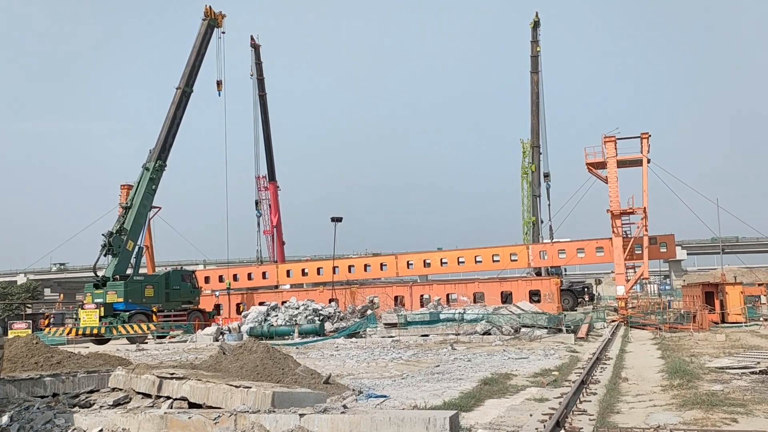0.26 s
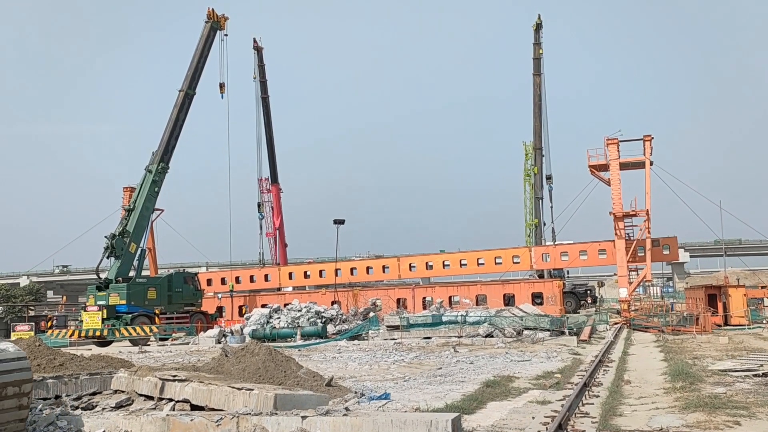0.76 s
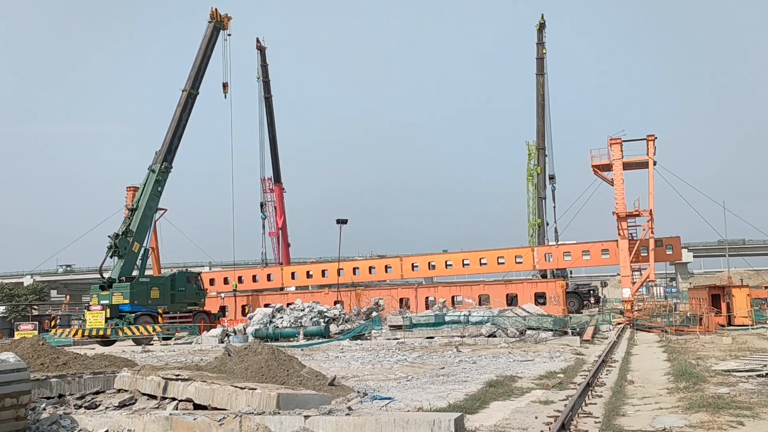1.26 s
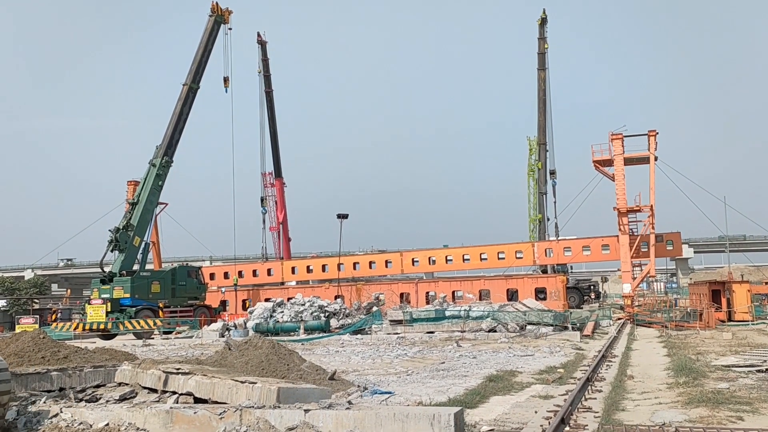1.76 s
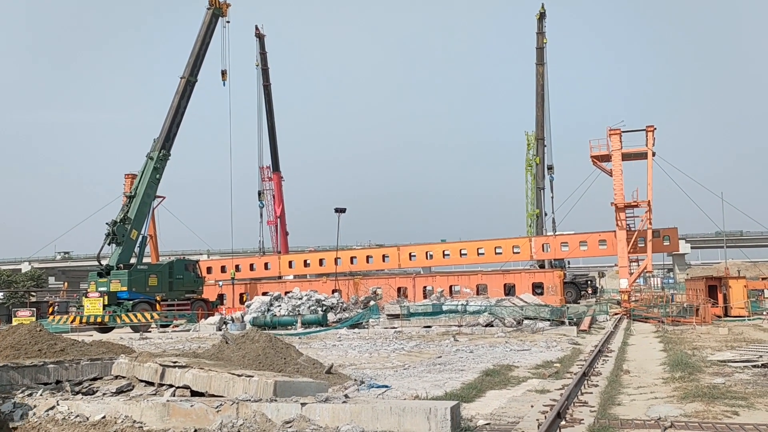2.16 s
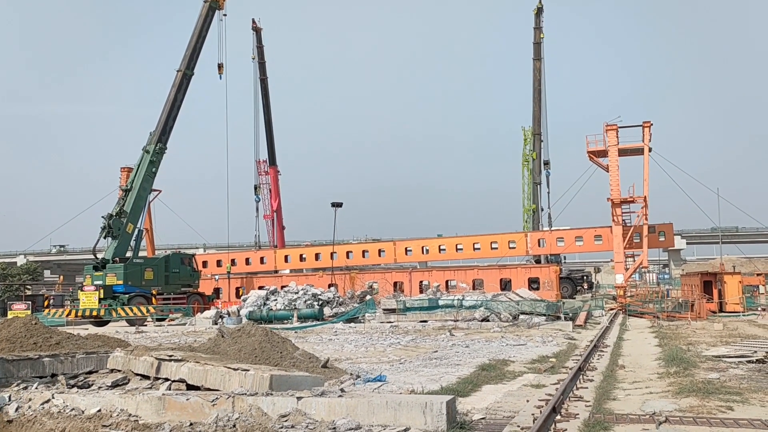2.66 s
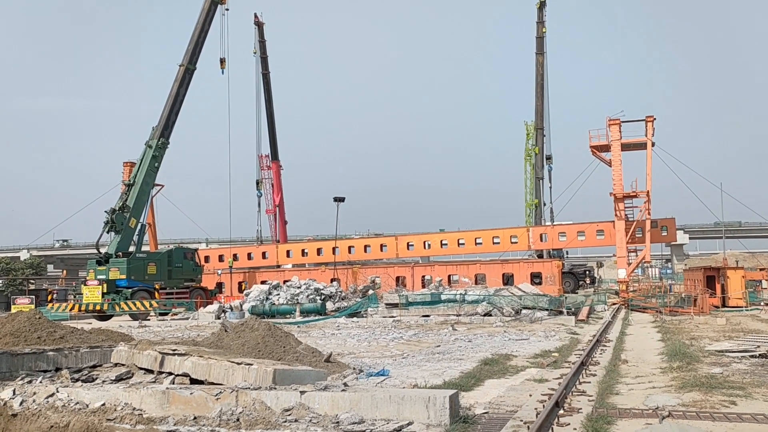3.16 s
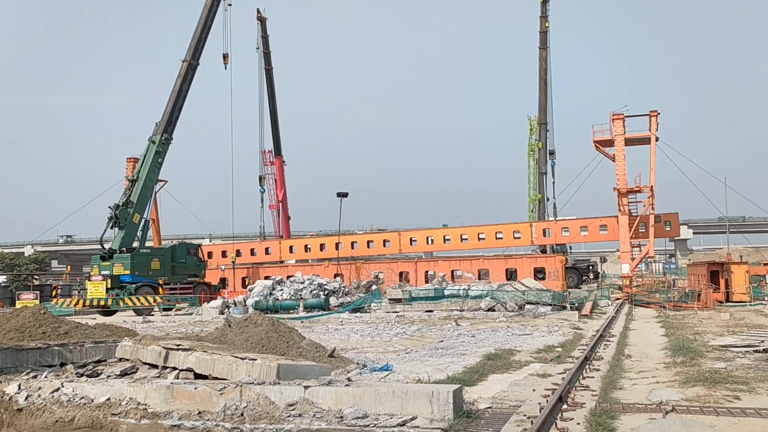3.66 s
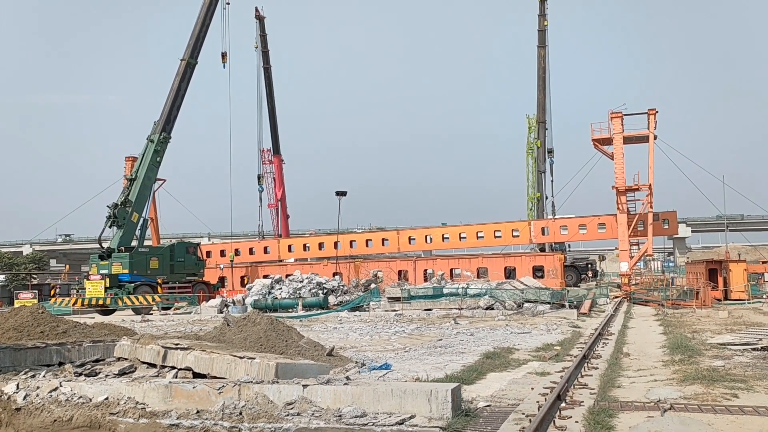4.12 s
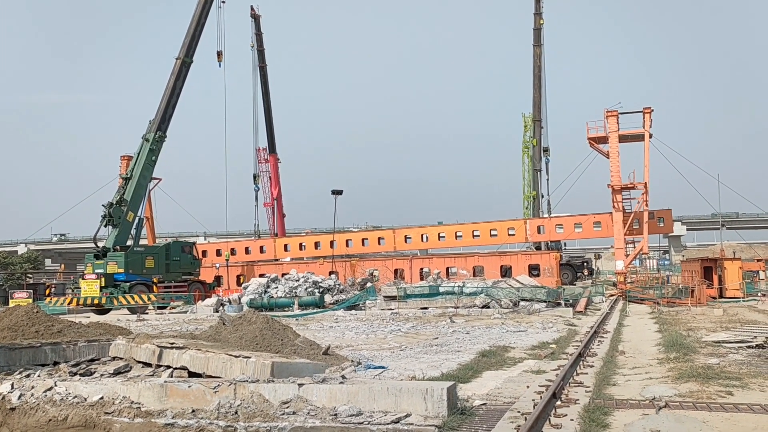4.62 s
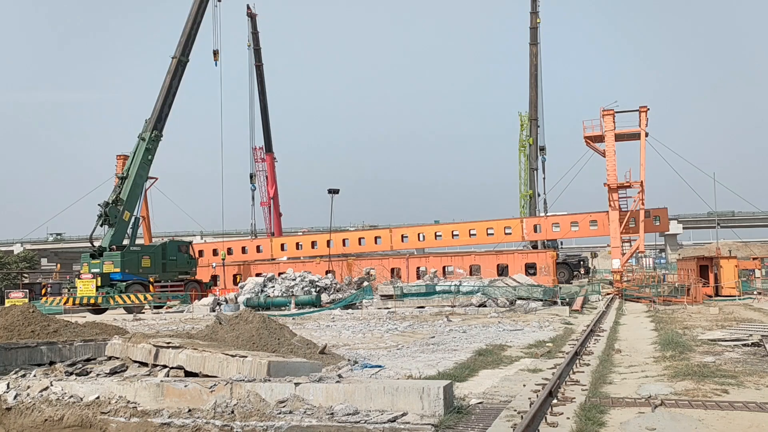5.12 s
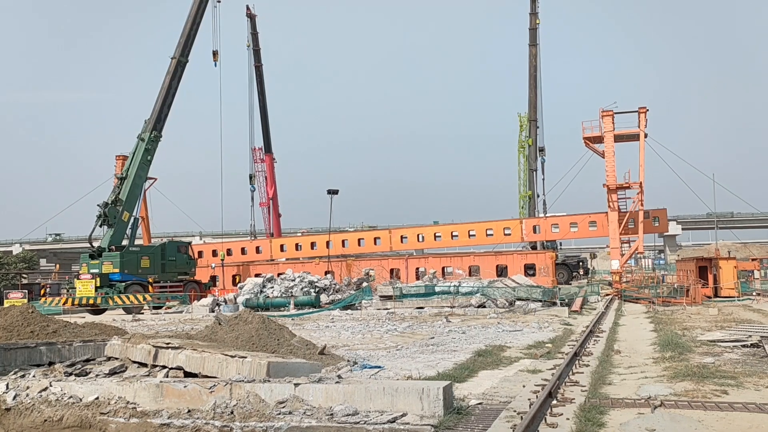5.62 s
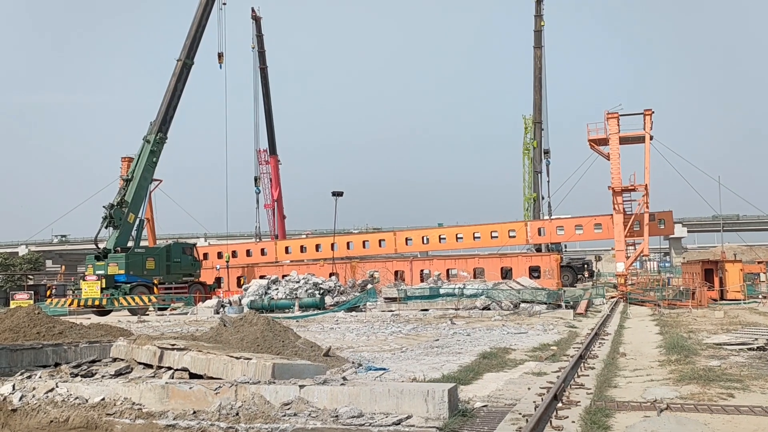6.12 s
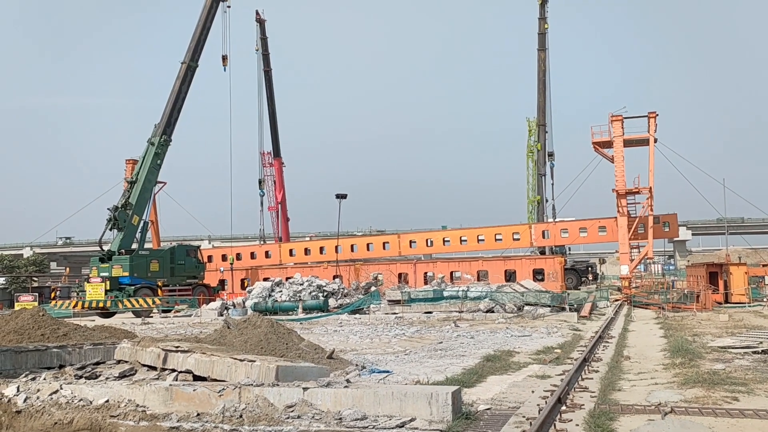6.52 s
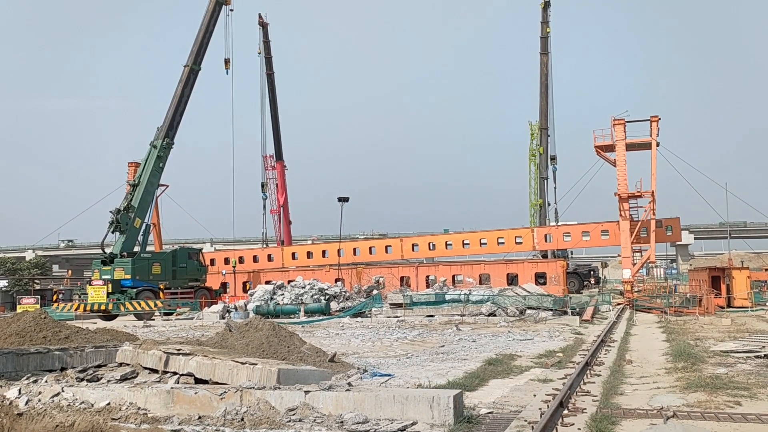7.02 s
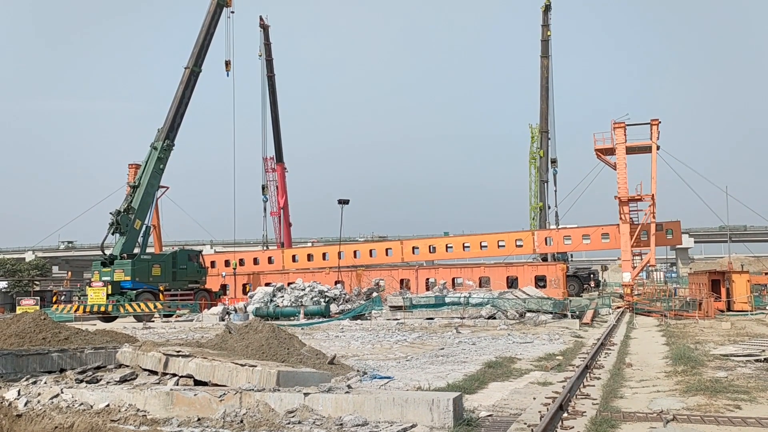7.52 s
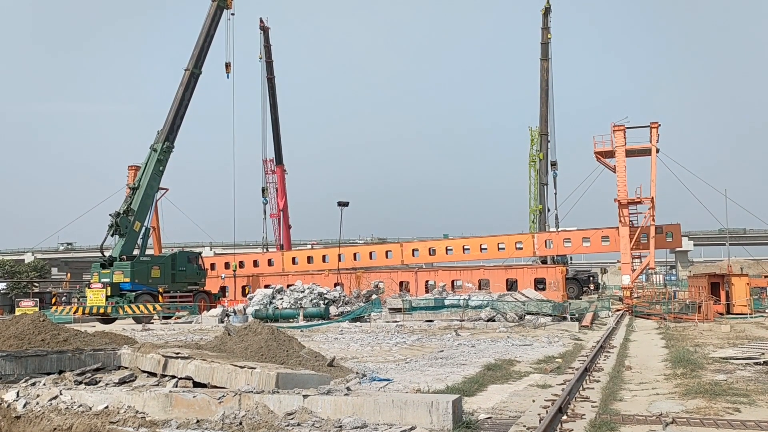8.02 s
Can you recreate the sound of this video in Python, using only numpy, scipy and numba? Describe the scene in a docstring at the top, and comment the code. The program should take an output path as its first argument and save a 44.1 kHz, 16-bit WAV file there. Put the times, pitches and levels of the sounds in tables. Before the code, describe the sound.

On an open building site, a crane's diesel engine runs steadily a little to the left, with a wavering hydraulic whine over a broad machinery roar. In the first two seconds, steel girders bang and ring in several quick clusters. The engine then labours on with faint chain clinks while wind gusts thump the microphone. Near the end it speeds up slightly and loose steel rattles lightly.

```python
"""An open building site: a crane's six-cylinder diesel works to the left of a phone with two ports.
One shaft drives exhaust, fan and nine-piston pump, so their pitches move together over the plant's roar.
Struck girders ring in their modes, chains clink, something squeals, and loose steel rattles as the load
is let go. Gusts buffet each port on its own, and the phone's gain control dips under the loudest sounds."""
import sys
import numpy as np
from scipy import signal
from scipy.fft import rfft, irfft
from scipy.io import wavfile
from scipy.ndimage import uniform_filter1d
from numba import njit

SR = 44100
rng = np.random.default_rng(int(sys.argv[2]) if len(sys.argv) > 2 else 0)


def to_wav(sig):
    """Store sig (one row per channel, or 1-D mono) as 16-bit WAV at the path in sys.argv[1].

    Samples outside -1..1 are clipped; the rate is SR.
    """
    pcm = np.clip(np.atleast_2d(sig), -1, 1) * 32767
    pcm = np.round(pcm).astype(np.int16)
    wavfile.write(sys.argv[1], SR, pcm.T)  # frames by channels


N = 365148
T = np.arange(N) / SR
TREBLE_LAG, STEEL_LAG, HUM_LAG = 19, 13, 31  # samples by which the right port hears later

# The shaft sags under load and speeds up on release: (time [s], piston rate [Hz])
PISTON_RATE = [(0, 257), (1.1, 260.8), (1.5, 260), (1.75, 257.5), (2.4, 253.7), (2.7, 252.3), (3.16, 252.8),
               (3.4, 250), (4.08, 252.8), (4.5, 252.3), (4.8, 250.7), (5.6, 250.3), (6.4, 251), (6.65, 256),
               (6.85, 262.6), (8.28, 255.2)]
# Strength of two machine tones: (time [s], pump whine [dB], fan tone [dB])
TONE_LEVELS = [(0, -26, -28.5), (.25, -38.5, -29.5), (.35, -28, -34), (.55, -22.5, -28), (.7, -20, -30),
               (.85, -32, -31), (1.25, -34.5, -29), (1.55, -31, -29), (1.62, -23.5, -40),
               (1.75, -35.5, -30.5), (2.1, -36, -30.5), (2.35, -31, -32), (2.7, -29, -28.5),
               (3.1, -24, -26), (3.4, -30, -30.5), (3.8, -28, -26.5), (4.2, -27, -28), (4.6, -26, -28),
               (4.9, -28, -25.5), (5.2, -25, -25), (5.6, -22.5, -27), (5.8, -22.5, -22), (5.93, -26, -27.5),
               (6.05, -25, -26.5), (6.3, -25.5, -28), (6.5, -24, -35), (6.66, -31.5, -33), (6.72, -40, -27),
               (6.78, -31, -31), (6.93, -33, -35), (7.0, -34, -30), (7.1, -37, -29.5), (7.17, -44, -31),
               (7.22, -30.5, -26), (7.3, -29.5, -31.5), (7.6, -27.5, -26), (7.9, -28, -27.5),
               (8.28, -24.5, -32)]
# Pump harmonics, plus an engine tone near 2340 Hz at 9.33: (multiple of piston rate [ratio], level [dB])
MACHINE_TONES = [(1, -39), (3, -56), (4, -58), (5, -61), (6, -60), (7, -60), (8, -58), (9, -59),
                 (9.33, -64), (10, -57), (11, -61)]
# Passing swells of those tones: (centre time [s], length [s], multiple [ratio], rise [dB])
TONE_SWELLS = [(2.75, 1.4, 3, 12), (4.5, 2.4, 3, 7), (6.1, 1., 3, 9), (6.95, .5, 3, 8), (8.1, .4, 3, 9),
               (6.95, .3, 4, 8), (7.5, .9, 4, 11), (6.35, .35, 5, 12), (6.8, .4, 5, 11), (7.35, .7, 5, 10),
               (5.4, 1.2, 4, 5), (5.9, .7, 7, 7), (6.85, .3, 7, 10), (3.45, .4, 8, 7), (5.2, 1., 8, 9),
               (6.95, .35, 8, 10), (5.4, .6, 9, 6), (6.2, .7, 9, 10), (6.9, .2, 9, 8), (4.85, .6, 9.33, 13),
               (4.85, .6, 10, 6), (5.95, 1.2, 10, 9), (6.5, .25, 11, 10)]
# Upper layers of the roar: (time [s], top [dB], treble [dB], middle [dB])
ROAR_LEVELS = [(0, -40, -36.5, -36), (.3, -39.5, -40, -39), (.6, -35, -37.5, -33), (1.18, -37.5, -37, -36),
               (1.88, -37.5, -38.5, -36.5), (2.15, -35, -38.5, -36.5), (2.7, -36, -36.5, -36),
               (3.0, -35, -37.5, -37), (3.16, -36, -35.5, -34), (3.39, -37, -38.5, -38),
               (4.0, -37, -38, -37), (4.2, -35.5, -36.5, -35.5), (4.82, -37, -36.5, -34.5),
               (5.55, -35, -36, -36.5), (6.1, -39.5, -39.5, -37.5), (6.6, -37.5, -38.5, -38),
               (6.8, -34.5, -37.5, -37.5), (7.22, -37.5, -38, -36.5), (7.5, -34, -35.5, -35),
               (7.79, -37.5, -35.5, -33.5), (7.95, -34, -34.5, -34), (8.28, -35.5, -35, -34)]
# Roar spectrum before each layer is set to its level: (frequency [Hz], relative density [dB])
ROAR_SPECTRUM = [(30, -6), (90, -13.5), (170, -6), (260, -16), (420, -17.5), (650, -28), (1050, -28),
                 (1550, -27.5), (2350, -27.5), (2900, -27.5), (3450, -29), (3850, -26), (5000, -30),
                 (6000, -33.5), (7300, -56)]
# Roar arriving straight from the machine: (frequency [Hz], share of power [0-1])
DIRECT_SHARE = [(60, .92), (170, .9), (330, .82), (520, .3), (700, .15), (900, .22), (1150, .68),
                (1600, .6), (2000, .22), (2600, .35), (3300, .38), (6000, .36)]
# Lead of the left port for that direct sound: (frequency [Hz], phase [rad])
LEFT_LEAD = [(0, 0), (170, .7), (260, .2), (350, 0), (780, 1.3), (1210, 2.9), (1640, 3.2), (1890, 3.5),
             (2580, 6.8), (2840, 8.9), (3100, 9.8), (3530, 9.2), (3880, 11.3), (4480, 12.3), (6030, 15.6),
             (6630, 18.9)]
# Blows on steel: (time [s], level [dB], rise [ms], decay [s], low-pass corner [Hz], boom [dB], clang [dB])
BLOWS = [(.0, -25.5, 2, 0.086, 1490, -18, 1.5), (0.065, -26.5, 2.5, 0.064, 1500, 7, 5),
         (0.415, -37.5, 15, 0.17, 4020, -9, 2), (0.462, -24, 6, 0.039, 6100, -10, -2.5),
         (0.505, -26, 5, 0.056, 7000, -4.5, 5), (0.676, -19, 9.1, 0.048, 5400, -3, 10),
         (0.706, -19, 6, 0.045, 7500, -7, 0), (0.737, -26, 3.9, 0.025, 4970, 11, 4),
         (0.775, -29.5, 5, 0.035, 1500, 6.5, 3.5), (1.223, -21, 2.2, 0.051, 3220, -6, 0),
         (1.255, -28.5, 5.3, 0.088, 3000, 0, 7), (1.312, -17.5, 12, 0.038, 3430, 3, 0),
         (1.343, -23, 6, 0.068, 2600, -0.5, 1.5), (1.422, -24.5, 8.7, 0.056, 2200, -1, 4.5),
         (1.526, -28.5, 3.7, 0.016, 3030, -2, -3), (1.58, -29, 8, 0.026, 1490, -5, -3),
         (1.608, -33.5, 5, 0.045, 786, -7, 1)]
# Girder resonances: (frequency [Hz], bandwidth [Hz], relative level [dB])
GIRDER_MODES = [(192, 28, 0.5), (309, 60, -3.5), (412, 34, -7), (584, 46, -13.5), (622, 28, -25),
                (748, 26, -19), (786, 19, -15.5), (898, 126, -8.5), (1057, 67, -12), (1300, 170, -13),
                (1705, 140, -16), (2300, 94, -14.5)]
# Broadband part of a blow: (frequency [Hz], relative density [dB])
CRASH_SPECTRUM = [(71, -35.5), (120, -21.5), (200, 1), (262, -7.5), (726, -11), (905, -13.5), (1580, -16.5),
                  (4780, -19.5), (6940, -25), (9020, -97), (15300, -120)]
# Wind strength: (time [s], rumble level [dB], left minus right [dB])
GUSTS = [(0, -41, -4.5), (.35, -33, -12), (.97, -24, 14), (1.2, -42, 5), (1.45, -30, -7), (1.71, -26, 0.5),
         (1.96, -36, -15.5), (2.15, -28.5, 0), (2.67, -39, -7), (2.8, -33, -11), (2.93, -28, -10),
         (3.25, -31, -4.5), (3.39, -40.5, -6), (3.76, -25, 3), (3.89, -40, -12), (4.4, -37, -2),
         (5.3, -48, 1.5), (5.47, -25, 13.5), (5.6, -33, 3.5), (5.7, -23, 24), (5.83, -33, 7),
         (5.93, -22, 22), (6.08, -30, 12.5), (6.48, -26, -2), (6.57, -35.5, 12.5), (7.12, -44, 7),
         (7.7, -40.5, -6.5), (8.0, -31, 16), (8.08, -38, 10), (8.28, -30, 20)]
# Strong eddies: (time [s], port [0 left, 1 right], level [dB], pitch [Hz], width [ms], relative slap [dB])
EDDIES = [(.248, 1, -11, 92, 5, -10), (0.521, 1, -22, 260, 6.3, -12), (0.59, 1, -11, 168, 9.1, -8),
          (.782, 0, 0.5, 167, 5, -16), (0.819, 0, -16, 130, 7.7, -22), (.994, 0, -0.5, 91, 6.3, -11),
          (1.059, 0, -10.5, 127, 6.2, -2), (1.682, 0, -12, 200, 10.5, -3.5), (1.997, 1, -19, 92, 10, -11),
          (2.612, 0, -7, 171, 3.3, -10), (2.884, 0, -19, 202, 4.1, -9), (2.945, 0, -11, 170, 8, -10),
          (2.945, 1, -17, 141, 8.5, -2), (3.009, 1, -12, 201, 6.5, -21), (3.106, 1, -8.5, 153, 4, -17),
          (3.127, 0, -7, 170, 4, -11), (3.161, 1, -3, 87, 4.6, -7), (3.173, 0, -9.5, 190, 8.7, 9.5),
          (3.184, 0, -4, 54.7, 13, -28), (3.22, 0, -1.5, 140, 2.9, -13), (3.27, 0, -4, 94, 11.7, -12.5),
          (3.315, 1, -13, 60, 8, -20), (3.332, 0, -21, 298, 4.4, -7), (3.342, 1, -10, 200, 6.8, -11),
          (3.584, 0, -13.5, 161, 12, -18), (3.607, 0, -16.5, 60, 10, -25), (3.696, 1, -8.5, 151, 7.9, -5),
          (3.74, 1, -3, 112, 4.9, -5), (3.809, 1, -14, 109, 9, -6), (4.776, 1, -7, 150, 3.7, -24),
          (5.474, 0, -6.5, 143, 7.3, -4.5), (5.49, 0, -12.5, 39.8, 16, -30), (5.506, 0, -11, 96, 7.6, -21),
          (5.615, 1, -11, 129, 5.3, -27), (5.676, 0, -9, 91, 9.4, -6), (5.689, 0, -10, 38, 15, -32),
          (5.715, 0, -1.5, 140, 4.7, -11), (5.734, 0, -13, 40, 15, -26), (5.767, 0, -13, 220, 5, 2.5),
          (5.807, 1, -12, 202, 8, -18), (5.834, 0, -1, 200, 5.5, -29), (5.879, 0, -2, 117, 4.3, -8),
          (5.923, 0, -4.5, 248, 7, -3), (5.941, 0, -8, 60, 12, -30), (5.97, 1, -14, 100, 6, 0),
          (5.983, 0, -4.5, 90, 4.3, -14), (6.007, 0, 2, 107, 11.5, -33), (6.059, 0, -7, 93, 6, -5.5),
          (6.156, 0, -13, 179, 13, -2), (6.1, 0, -12, 171, 9.3, -19), (6.197, 0, -11.5, 211, 8.6, -2),
          (6.25, 0, -9, 131, 11.4, -9), (6.288, 1, -2.5, 65, 11, -7), (6.294, 0, 3.5, 77, 10.3, -10),
          (6.345, 0, -8, 140, 7.3, -17), (6.347, 1, -21, 603, 5.4, -2), (6.386, 0, -8.5, 150, 6.8, -15),
          (6.404, 1, -4, 170, 2.8, -8.5), (6.451, 0, -13, 130, 11, -24), (6.482, 0, -12.5, 134, 16, -3),
          (6.52, 1, -14, 220, 7.2, -14), (6.538, 0, -7, 190, 4.4, -12), (7.013, 0, -15.5, 194, 7, -15),
          (7.978, 0, -2, 166, 4.9, -14), (8.233, 0, -6, 50, 20, -13)]
# Chain links and plates: (centre time [s], level [dB], frequency [Hz], half-width [s])
CHAIN_CLINKS = [(0.51, -25.5, 4040, 0.0094), (1.627, -34.5, 632, 0.058), (2.149, -40, 3700, 0.092),
                (2.439, -33, 2200, 0.024), (2.433, -39, 3220, 0.016), (4.16, -37, 1960, 0.041),
                (7.187, -39, 2050, 0.068), (7.35, -38.5, 807, 0.06), (7.36, -42, 2400, 0.062),
                (7.548, -34.5, 2770, 0.032), (7.512, -36, 1930, 0.077), (7.622, -42, 790, .04),
                (7.94, -37, 964, 0.044), (7.847, -38, 1940, 0.11), (7.928, -38, 2440, 0.085),
                (8.158, -38, 2740, 0.04)]
# Chatter of loose steel: (time [s], level [dB])
RATTLE_LEVELS = [(6.6, -69.5), (6.85, -43), (7.2, -42), (7.35, -42), (7.55, -40), (7.7, -42), (7.9, -36),
                 (8.05, -43), (8.17, -40), (8.28, -43)]
# Faint high hiss: (time [s], level [dB])
HISS_LEVELS = [(0, -66), (.3, -69), (.62, -61), (1.3, -72), (2.16, -67), (3.1, -65), (3.3, -69),
               (5.45, -65), (6.34, -73), (6.63, -70), (6.78, -57), (7.02, -64), (8.28, -64)]
# Bands of that hiss: (centre frequency [Hz], relative level [dB])
HISS_SPECTRUM = [(10600, 0), (13600, -4)]


def undb(db):
    """Amplitude grows tenfold for every 20 dB."""
    return 10 ** (np.asarray(db) / 20)


def level(x, db):
    """Normalisation to unit rms, then a gain in dB."""
    return x * undb(db) / np.sqrt(np.mean(x ** 2))


def curves(table):
    """Linear interpolation of each column over time."""
    times, *columns = np.transpose(table)
    return [np.interp(T, times, column) for column in columns]


def at(table, hz):
    """Interpolation of a spectrum in log frequency."""
    freqs, values = np.transpose(table)
    return np.interp(np.log(hz), np.log(freqs), values)


def late(x, lag):
    """Propagation delay of lag samples."""
    return np.concatenate([np.zeros(lag), x[:-lag]])


def from_left(x, lag):
    """Path difference: sound from the left reaches the right port later."""
    return np.array([x, late(x, lag)])


def band(x, hz, width):
    """Second-order resonance with unit gain at its centre."""
    return signal.lfilter(*signal.iirpeak(hz, hz / width, SR), x)


def walk(rate):
    """Slow random modulation: steps held 1 / rate s and smoothed twice, with a spread near 1."""
    hold = int(SR / rate)
    steps = np.repeat(rng.standard_normal(N // hold + 1), hold)
    return 1.42 * uniform_filter1d(uniform_filter1d(steps, hold), hold)[:N]


def tone(cycles, db):
    """Moving air modulates the amplitude and phase of a sine of given rms level."""
    amplitude = np.sqrt(2) * undb(db + .7 * walk(9))
    return amplitude * np.sin(2 * np.pi * cycles + .12 * walk(10) + 7 * rng.random())


def exhaust(firing_cycles):
    """Forced resonance: slightly uneven firing pulses drive the exhaust's low mode."""
    pulses = np.diff(np.floor(firing_cycles), prepend=0) * undb(1.5 * rng.standard_normal(N))
    hz, width = 86, 40
    return level(band(band(pulses, hz, width), hz, width), -33)


def fan(piston_cycles, db):
    """Periodic blade passage gives a tone locked to the shaft."""
    blades_per_stroke = .677  # set by belt ratio and blade count
    return tone(blades_per_stroke * piston_cycles, db + 1.5 * walk(25))


def far_hum():
    """Amplitude modulation: a distant tone of steady pitch swells and fades."""
    return tone(218.7 * T, -38.5 + 3 * walk(2.325))


def machine_tones(piston_cycles, piston_hz, whine_db):
    """Shaft-locked tones: pump harmonics, the second a whine, and an engine tone that swells briefly."""
    loaded_hz = 252  # the whine is steadiest under load
    flicker_db = 1 + .25 * np.maximum(piston_hz - loaded_hz, 0)
    whine = tone(2 * piston_cycles, whine_db - flicker_db * np.abs(walk(14)))
    out = from_left(whine, lag=11) * undb([[-7.5], [0]])  # shadowed at the left port
    for multiple, db in MACHINE_TONES:
        swell_db = sum(rise * np.exp(-(2 * (T - centre) / length) ** 4)
                       for centre, length, which, rise in TONE_SWELLS if which == multiple)
        sine = tone(multiple * piston_cycles, db + swell_db + 1.2 * walk(3))
        out += from_left(sine, lag=TREBLE_LAG if multiple > 5 else 10 if multiple > 1 else HUM_LAG)
    return out


def roar(firing_cycles):
    """Direct and diffuse fields: noise common to both ports throbs with the firings; the rest scatters."""
    swell_db = .3 * walk(6)
    throb = 1 + .1 * np.cos(2 * np.pi * firing_cycles)
    hz = np.maximum(np.fft.rfftfreq(N, 1 / SR), 1)
    share = at(DIRECT_SHARE, hz)
    split = np.sqrt([share, 1 - share, 1 - share])  # direct, diffuse left, diffuse right
    colour = undb(at(ROAR_SPECTRUM, hz))
    layers = np.zeros((4, 3, N))  # rumble, middle, treble, top
    for centre in 40 * 2 ** np.arange(0, 7.6, .5):  # each half-octave flickers on its own
        window = np.cos(np.clip(np.log2(hz / centre) * np.pi, -np.pi / 2, np.pi / 2))
        noise = rng.standard_normal((3, len(hz))) + 1j * rng.standard_normal((3, len(hz)))
        fields = irfft(window * colour * split * noise, N)
        fields[0] *= throb
        layers[np.searchsorted([500, 1600, 3400], centre)] += fields * undb(swell_db + 1.2 * walk(20))
    top_db, treble_db, middle_db = curves(ROAR_LEVELS)
    levels_db, pans_db = [-28, middle_db, treble_db, top_db], [-.5, -.5, -1.5, -.5]
    delay = np.exp(-1j * np.interp(hz, *np.transpose(LEFT_LEAD)))
    out = 0
    for (direct, left, right), db, pan_db in zip(layers, levels_db, pans_db):
        ports = np.array([direct + left, irfft(rfft(direct) * delay, N) + right])
        out += level(ports, db) * undb([[pan_db / 2], [-pan_db / 2]])
    return out


def girder_bangs():
    """Modal response: each blow rattles the steel into a crash and a ring, scattered by the site."""
    out = np.zeros((2, N))
    size, knock = int(.5 * SR), int(.004 * SR)
    t = np.arange(size) / SR
    freqs = np.maximum(np.fft.rfftfreq(size, 1 / SR), 20)
    for start, db, rise_ms, decay, corner_hz, boom_db, clang_db in BLOWS:
        attack = 1 - np.exp(-1000 * t / rise_ms)
        fall = np.exp(-(t / decay) ** 2) + .24 * np.exp(-t / .12)
        knocks = np.repeat(rng.standard_normal(size // knock + 1), knock)
        envelope = attack * fall * undb(1.8 * uniform_filter1d(knocks, knock)[:size])
        direct = from_left(rng.standard_normal(size), STEEL_LAG)
        scattered = rng.standard_normal((2, size))
        drive = (direct + scattered * [[1.85], [2.33]]) * envelope
        low_drive = (direct + .5 * scattered) * envelope  # low modes reach both ports nearly alike
        crash = irfft(rfft(drive) * undb(at(CRASH_SPECTRUM, freqs)) / (1 + (freqs / corner_hz) ** 4), size)
        head = int((decay + .015) * SR)  # the loud part of the blow
        ring = 0
        for hz, width, mode_db in GIRDER_MODES:
            force, lift_db = (low_drive, boom_db) if hz < 450 else (drive, clang_db if hz < 1500 else 0)
            mode = band(band(force, hz, width), hz, 6 * width)
            ring += undb(mode_db + lift_db) * mode / np.std(mode[:, :head]) / (1 + (hz / corner_hz) ** 4)
        i = int(start * SR)
        out[:, i:i + size] += undb(db) * (crash / np.std(crash[:, :head]) + undb(-4) * ring)
    return out


def wind():
    """Turbulence is local: each port gets its own rumble, ragged flutter and eddies."""
    db, pan_db = curves(GUSTS)
    port_db = db + np.array([pan_db, -pan_db]) / 2
    air = rng.standard_normal((2, N))
    rumble = signal.sosfilt(signal.butter(2, [18, 80], "bandpass", fs=SR, output="sos"), air)
    flutter = signal.sosfilt(signal.butter(4, [90, 330], "bandpass", fs=SR, output="sos"), air)
    rumble_db = port_db + 2.2 * np.array([walk(16), walk(14)])
    flutter_db = 1.1 * port_db - 7.5 + 4.5 * np.array([walk(35), walk(35)])  # grows faster in a gust
    return level(rumble, rumble_db) + level(flutter, flutter_db) + eddy_thumps(port_db)


def small_eddies(port_db, count=30):
    """A random point process: lesser eddies, likelier in strong wind, as rows like those of EDDIES."""
    odds = np.cumsum(undb(port_db.ravel()))
    port, sample = np.divmod(np.searchsorted(odds, rng.random(count) * odds[-1]), N)
    pitch, width, slap = rng.standard_normal((3, count))
    return np.transpose([np.clip(sample / SR, .1, T[-1]), port, np.full(count, -15),
                         97.4 * np.exp(.49 * pitch), 11.1 * np.exp(.26 * width), -18.5 + 3 * slap])


def eddy_thumps(port_db):
    """Pressure transients: an eddy's sharp front slaps one port, and a brief low thump follows."""
    out = np.zeros((2, N))
    half = 2600  # samples each side of an eddy
    t = np.arange(-half, half) / SR

    def puff(hz, ms, phase=0, lag=0):
        """Gaussian wave packet, delayed by lag times its width."""
        return np.cos(2 * np.pi * hz * t + phase) * np.exp(-(1000 * t / ms - lag) ** 2)

    slap = puff(hz=390, ms=1.8, lag=.36) + undb(-9) * puff(hz=765, ms=.78)
    for time, port, db, hz, ms, slap_db in np.vstack([EDDIES, small_eddies(port_db)]):
        polarity, phase = rng.random(2) - .5
        thump = puff(hz, ms, phase, lag=.41)
        undertone = .5 * puff(.7 * hz, ms, phase - np.pi / 2, lag=.82)
        pulse = np.sign(polarity) * undb(db) * (thump + undertone + undb(slap_db) * slap)
        i = int(time * SR) - half
        out[int(port), i:i + len(t)] += pulse[:N - i]
    return out


def chain_clinks():
    """Narrow resonances: far links and plates each sound a short burst of band-limited noise."""
    out = np.zeros((2, N))
    t = np.arange(int(.1 * SR) * 2) / SR - .1
    for centre, db, hz, half_width in CHAIN_CLINKS:
        ring = band(rng.standard_normal(len(t)), hz, width=.037 * hz)
        clink = level(ring, db) * np.exp(-(t / half_width) ** 2)
        i = int((centre - .1) * SR)
        out[:, i:i + len(t)] += from_left(clink, STEEL_LAG)[:, :N - i]
    return out


def squeal():
    """A linear chirp: one thin, high tone comes and goes, rising slightly as it fades."""
    centre_s, length_s, hz, rise_hz_per_s, fade_db_per_s = 6.08, .76, 6642, 30, 15
    t = T - centre_s
    chirp = tone(hz * T + rise_hz_per_s * t ** 2 / 2, -60.5 - fade_db_per_s * t + walk(5.7))
    return from_left(chirp * np.exp(-(2 * t / length_s) ** 4), TREBLE_LAG)


def steel_rattle():
    """Randomly modulated noise in a broad resonance: loose steel chatters as the load is let go."""
    hz, width = 2350, 1400
    noise = band(band(rng.standard_normal(N), hz, width), hz, width)
    chatter = noise * undb(3 * walk(rate=40))
    return from_left(level(chatter, curves(RATTLE_LEVELS)[0]), lag=10)


def scene():
    """Superposition at the two ports, with one shaft timing exhaust, fan, pump and the roar's throb."""
    piston_hz = curves(PISTON_RATE)[0]
    piston_cycles = np.cumsum(piston_hz) / SR
    firing_cycles = piston_cycles / 3  # three firings and nine piston strokes a turn
    whine_db, fan_db = curves(TONE_LEVELS)
    hum = exhaust(firing_cycles) + fan(piston_cycles, fan_db) + far_hum()
    steady = from_left(hum, HUM_LAG) * undb([[-1.2], [0]])
    steady += machine_tones(piston_cycles, piston_hz, whine_db) + roar(firing_cycles)
    return steady + girder_bangs() + wind() + chain_clinks() + squeal() + steel_rattle()


@njit
def follow(x, attack_s, release_s, value):
    """Envelope detection with separate time constants for rise and fall."""
    envelope = np.empty(len(x))
    for i in range(len(x)):
        value += (x[i] - value) / (SR * (attack_s if x[i] > value else release_s))
        envelope[i] = value
    return envelope


def record(dry):
    """Saturation, band limiting and faint hiss, then gentle compression led by the louder port."""
    mic_band_hz, top_hz, threshold = 7200, 15100, .12
    rounded = np.tanh(.8 * dry) / .78
    x = signal.sosfilt(signal.ellip(10, .5, 60, mic_band_hz, fs=SR, output="sos"), rounded)
    air = from_left(rng.standard_normal(N), TREBLE_LAG) + rng.standard_normal((2, N))
    hiss = sum(band(band(air, hz, 3000), hz, 3000) * undb(db + 1.5 * walk(24)) for hz, db in HISS_SPECTRUM)
    x += level(hiss, curves(HISS_LEVELS)[0])
    envelope = follow(np.abs(x).max(axis=0), attack_s=.074, release_s=.5, value=.14)
    x *= np.minimum(threshold / envelope, 1) ** .2
    return signal.sosfilt(signal.ellip(8, .2, 70, top_hz, fs=SR, output="sos"), x)


dry = scene()
out = record(dry)
to_wav(out)
```